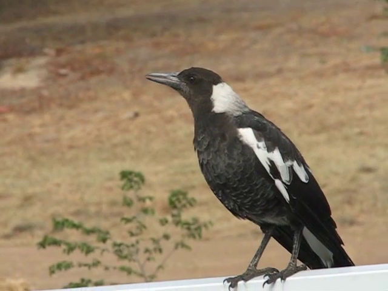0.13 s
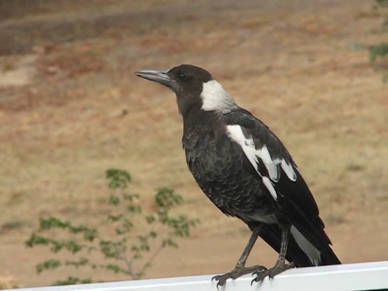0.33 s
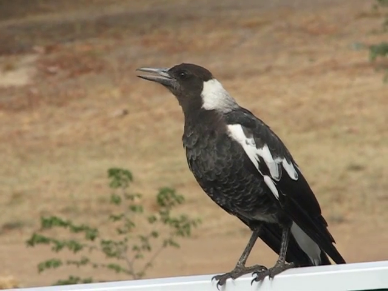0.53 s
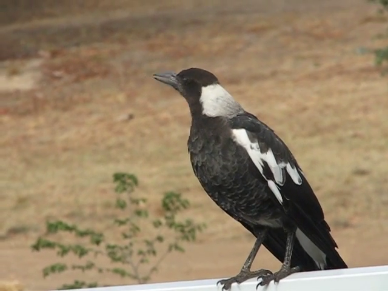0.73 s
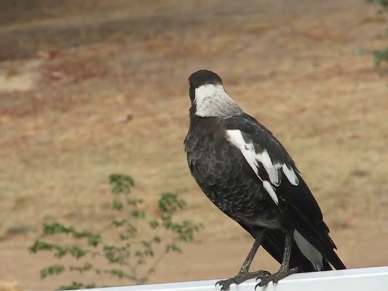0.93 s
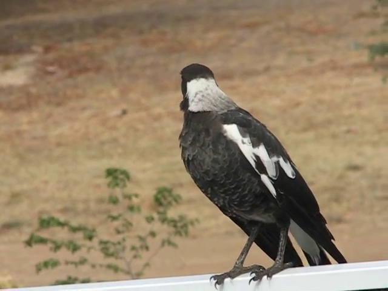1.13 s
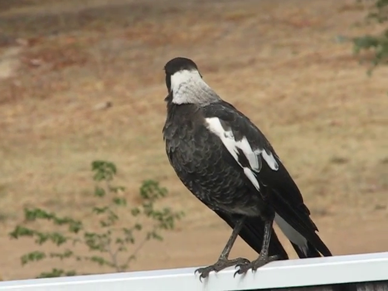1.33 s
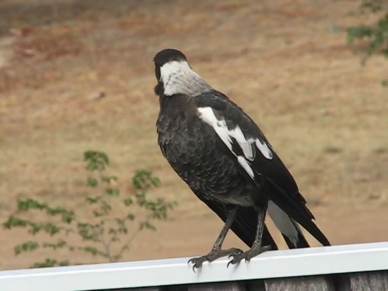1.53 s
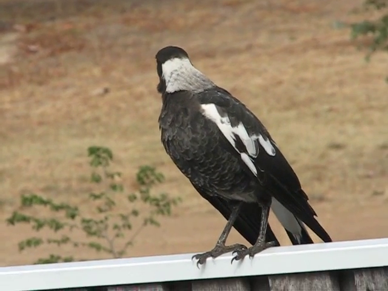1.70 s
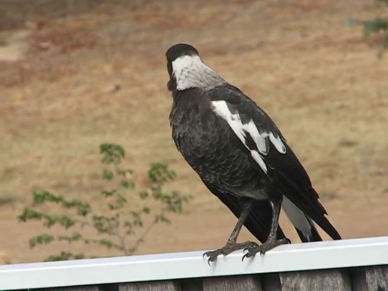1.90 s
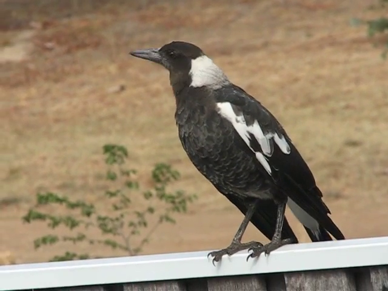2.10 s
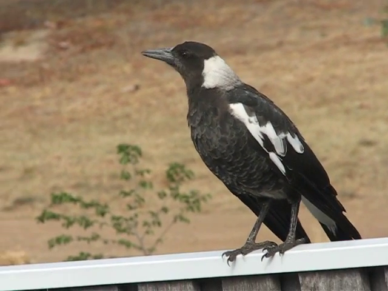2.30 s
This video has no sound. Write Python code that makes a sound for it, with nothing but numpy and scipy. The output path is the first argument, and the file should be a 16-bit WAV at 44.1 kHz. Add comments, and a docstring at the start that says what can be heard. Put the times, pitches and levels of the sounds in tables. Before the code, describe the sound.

A magpie warbles outdoors with short yard echoes. From 0.2 to 0.7 s, fluty notes slide and overlap, rising and then dropping to the loudest one near 0.6. Faint low murmurs follow around 0.9-1.2, hoarse warbles at 1.5-1.9, a clear pulsing note at 1.95-2.05, and a weak ending near 2.2. Soft hiss, throbbing hum, distant engine, and very faint high whines continue throughout.

```python
"""A magpie warbles: fluty sliding notes, some overlapping as from the two sides of its syrinx, in yard echoes.
Each note is a gliding sine with throat-coloured overtones; random wobbles make it waver and rasp.
Thin high sines add far birds and one ringing overtone of the magpie; sines make a beating hum and passing engine.
Shaped noise gives an outdoor hiss; there are also two faint buzzing whines and a squeal in steps.
"""
import sys
import numpy as np
from scipy import signal
from scipy.fft import rfft, irfft, next_fast_len
from scipy.io import wavfile
from scipy.ndimage import uniform_filter1d, map_coordinates

SR = 44100
rng = np.random.default_rng(int(sys.argv[2]) if len(sys.argv) > 2 else 0)


def to_wav(s):
    """Save 16-bit WAV."""
    ch = np.atleast_2d(s).T  # columns
    pcm = np.round(np.clip(ch, -1, 1) * 32767)  # PCM
    wavfile.write(sys.argv[1], SR, pcm.astype(np.int16))


N = 103635
T = np.arange(N) / SR  # time in seconds
TOP_HZ = 15690  # no sound is kept from here up
EDGE_S = 0.0034  # fade at each end of a short sound


def amp(db):
    """Turn decibels into a plain multiplier."""
    return 10 ** (np.asarray(db) / 20)


def unit(x):
    """Scale a signal to an average strength (rms) of 1."""
    return x / np.sqrt(np.mean(x ** 2) + 1e-20)


def along(points, hz):
    """Read (Hz, value) points at any frequency, on a log axis."""
    f, v = np.transpose(points)
    return np.interp(np.log(hz + 1), np.log(f + 1), v)


def curves(rows, t=T):
    """Join the points of each column after the time, giving one value per moment."""
    s, *cols = np.transpose(rows)
    return [np.interp(t, s, c) for c in cols]


def wobble(rate):
    """A smooth random curve through this many random points a second."""
    points = rng.standard_normal(int(N * rate / SR) + 4)
    return map_coordinates(points, [T * rate])


def tone(hz, turn=0):
    """A sine of rms 1 that follows a pitch curve; turn is its starting point in cycles."""
    cycles = np.cumsum(hz) / SR + turn
    return np.sqrt(2) * np.sin(2 * np.pi * cycles)


def filtered(x, response):
    """Multiply each frequency of x by the response at that frequency."""
    m = next_fast_len(N + SR // 2)
    gain = response(np.fft.rfftfreq(m, 1 / SR))
    return irfft(rfft(x, m) * gain, m)[..., :N]


def edges(t, start, end):
    """A soft start and stop, silent outside."""
    nearest_end = np.minimum(t - start, end - t)
    return np.sin(np.pi / 2 * np.clip(nearest_end / EDGE_S, 0, 1)) ** 2


def magpie():
    """A syrinx gives near-sine notes; the throat colours their hoarse overtones."""
    # magpie notes: (overtones/dB, roughness 0-1, [(t/s, f/Hz, level/dB)])
    notes = [ (-10, 0.012, [(.222, 902, -37.5), (.243, 1010, -25.5), (.265, 1007, -36)]),
             (-6, 0.23, [(.258, 832.6, -35.5), (.295, 677, -36.5), (.33, 774.4, -34), (.37, 636, -41.5)]),
             (-6.5, 0.0097, [(.399, 1258, -26), (.445, 1339, -24.5), (.458, 1413, -36.5),
             (.472, 1463, -21.5), (.495, 1658, -30.5)]), (6, 0.22, [(.481, 956, -32.5), (.515, 1018, -35)]),
             (-12, 0.014, [(.512, 1445, -30), (.548, 1432, -22.5), (.575, 1529, -18.5), (.6, 1555, -35.5)]),
             (-3, 0.016, [(.582, 1177, -24), (.617, 1202, -13), (.634, 1136, -23.5), (.65, 1098, -16.5),
             (.675, 1128, -20), (.725, 1093, -29.5)]), (-12, 0.18, [(1.088, 1032, -32), (1.12, 753.5, -43),
             (1.16, 862, -38), (1.2, 706, -41.5)]), (-9, 0.19, [(1.482, 1215, -37), (1.525, 1030, -31),
             (1.59, 1053, -43)]), (-3.5, 0.17, [(1.604, 1580, -37), (1.615, 1201, -28.5),
             (1.635, 1121, -28.5), (1.65, 1376, -37), (1.683, 1124, -40)]), (-17, 0.27, [(1.695, 1465, -36),
             (1.725, 1375, -28.5), (1.75, 1234, -39), (1.768, 1040, -30), (1.8, 1092, -34.5)]),
             (-8, 0.083, [(1.8, 741, -36), (1.825, 801, -32.5), (1.85, 620, -34), (1.9, 763.5, -41.5),
             (1.935, 760, -35.5)]), (5.5, 0.334, [(1.95, 1226, -55), (1.975, 1429, -28), (1.987, 1204, -34),
             (2.02, 1227, -38), (2.07, 1140, -56)]), (-3, 0.084, [(1.94, 1005, -32), (1.958, 1008, -19.5),
             (1.978, 995, -32.5), (2.0, 1000, -16.5), (2.017, 1041, -28), (2.032, 1016, -18),
             (2.062, 1055, -37.5)]), (-7.5, 0.047, [(2.196, 1003, -35), (2.203, 1024, -29.5),
             (2.25, 1150, -55)]), ]
    # brief glides of the magpie; the second row is not a note of its own but the strong
    # second overtone of the note near 1000 Hz, sliding upward:
    # (start/s, length/s, first f/Hz, last f/Hz, level in the middle/dB)
    glides = [(0, 0.056, 978, 1012, -35.5), (0.482, 0.038, 1752, 2135, -37.5),
              (0.936, 0.11, 1007, 990, -37), (0.919, 0.16, 701, 888, -37), (1.061, 0.03, 1308, 1486, -34),
              (1.213, 0.012, 1197, 1244, -38), (1.502, 0.045, 1261, 1076, -31),
              (1.567, 0.022, 1210, 1260, -29), (1.855, 0.045, 1060, 940, -33.5),
              (1.893, 0.031, 1443, 1455, -37.5), (1.908, 0.039, 1319, 1216, -31.5),
              (2.127, 0.042, 678, 790, -33)]
    # throat colour: (f/Hz, overtone level against the fundamental/dB)
    throat = [(1350, -3), (2200, -20), (3500, -30), (4500, -17), (5900, -32.5), (9000, -33), (14500, -65)]
    glide_rough, glide_bright_db = 0.36, -7  # roughness and overtone level of the brief glides
    glide_arch_db = 5  # a brief glide is this much weaker at both ends
    effort_s = 0.02  # overtones follow the level averaged over this long
    waver_depth, smear = 0.013, 0.13  # slow and fast pitch changes, scaled by roughness below

    brief_glides = []
    for start, length, first, last, db in glides:
        rows = [(start, first, db - glide_arch_db),
                (start + length / 2, (first + last) / 2, db),
                (start + length, last, db - glide_arch_db)]
        brief_glides.append((glide_bright_db, glide_rough, rows))

    song = np.zeros(N)
    waver = wobble(76)
    shimmer = wobble(331.7)  # fast enough to sound hoarse
    for bright_db, rough, rows in notes + brief_glides:
        start = max(rows[0][0] - EDGE_S, 0)
        end = rows[-1][0] + EDGE_S
        span = slice(int(start * SR), int(end * SR))
        hz, db = curves(rows, T[span])
        # each sound reads waver from its beginning
        own_waver = np.roll(waver, span.start)[span]
        hz = hz * (1 + waver_depth * (0.38 + 3 * rough) * own_waver)
        rasp_share = np.sqrt(np.abs(rough))

        overtones = 0
        for k in range(2, 15):
            # time shifts give each overtone its own level and pitch flutter
            flutter = 1 + 0.51 * np.roll(shimmer, k * SR // 20)[span]
            jitter = 1 + smear * rasp_share * np.roll(shimmer, -k * SR // 20)[span]
            level = amp(along(throat, k * hz)) * flutter * (k * hz < TOP_HZ)
            overtones = overtones + level * tone(k * hz * jitter)

        effort_db = uniform_filter1d(db, int(effort_s * SR))
        voice = amp(db) * tone(hz) + amp(effort_db + bright_db) * overtones
        # rough sounds swap some of their steady level for a random one
        rasp = np.sqrt(np.abs(1 - rough)) + rasp_share * np.roll(shimmer, span.start)[span]
        song[span] += rasp * edges(T[span], start, end) * voice
    return song


def yard(x, wet_db):
    """Echoes blur into a fading noise tail after the direct sound, different on each side."""
    # echo fade: (f/Hz, time to fall by 60 dB/s)
    fade_times = [(900, 0.33), (5000, 0.2)]
    noise = rng.standard_normal((2, SR * 3 // 4))
    hz, t, z = signal.stft(noise, SR, nperseg=256)
    fade = amp(-60 * t / along(fade_times, hz)[:, None])
    tail = signal.istft(z * fade, SR, nperseg=256)[1]
    tail = np.array([tail[0] + 0.5 * tail[1], tail[0] - 0.5 * tail[1]])
    tail *= amp(wet_db) / np.linalg.norm(tail[0])
    tail[:, 0] += 1  # the direct sound
    return signal.fftconvolve(x[None], tail, axes=1)[:, :N]


def thin_high_tones():
    """Gliding sines, blurred by random level and pitch: far birds and one magpie overtone."""
    # small far birds, but the second row is a high overtone of the magpie's low note,
    # ringing in its throat: (start/s, length/s, first f/Hz, last f/Hz, level/dB)
    high_glides = [(0.861, 0.17, 4500, 3764, -59.5), (1.82, .07, 7850, 7200, -54),
                   (1.925, 0.016, 3690, 4800, -51), (1.939, 0.035, 4870, 4800, -56),
                   (2.034, 0.073, 5850, 5270, -59)]
    tones = np.zeros(N)
    for start, length, first, last, db in high_glides:
        level = amp(db + 3.8 * wobble(90))
        glide = np.interp(T, [start, start + length], [first, last])
        tones += level * edges(T, start, start + length) * tone(glide * (1 + 0.015 * wobble(300)))
    return tones


def machine_hum():
    """A machine's speed sets its hum; a second tone just below beats with it as a throb."""
    # machine speed: (t/s, f/Hz)
    speed_points = [(0, 77.74), (2.35, 75.7)]
    # hum tones: (multiple of the speed, level/dB)
    hum_orders = [(1, -46.5)]
    # lower tone: (t/s, level/dB)
    throb_points = [(0, -63), (.6, -50), (1.3, -52), (1.9, -59)]
    throb_hz = 7.8  # gap between the two tones, so beats a second
    speed, = curves(speed_points)
    hum = sum(amp(db + wobble(6)) * tone(speed * k) for k, db in hum_orders)
    throb = amp(curves(throb_points)[0]) * tone(speed - throb_hz, 0.22)
    return hum + throb


def engine():
    """A passing engine sounds at multiples of its firing rate, wavering in level and pitch."""
    # engine passing: (t/s, firing f/Hz, level change/dB)
    passing = [(0, 36, -13.5), (1.2, 35.68, 1.5), (2.35, 35.31, -3.5)]
    # engine tones: (multiple of the firing rate, level before the change/dB)
    engine_orders = [(6, -50.5), (7, -52), (8, -52)]
    firing, pass_db = curves(passing)
    sound = np.zeros(N)
    for k, db in engine_orders:
        level = amp(db + pass_db + 3.8 * wobble(7.45))
        pitch = k * firing * (1 + 0.01216 * wobble(9.13))
        sound += level * tone(pitch, rng.random())
    return sound


def hiss():
    """Outdoor noise, near mono in the bass, slightly patchy in time and frequency."""
    # noise colour: (f/Hz, relative level per Hz/dB)
    colour = [(30, -20.5), (90, -7), (230, -5), (400, -18), (900, -15), (1500, -19), (8200, -26),
              (10000, -34.5), (15600, -40)]
    # left-right likeness: (f/Hz, 1 for the same to -1 for opposite)
    likeness = [(60, 1), (290, 0.913), (1400, 0.63), (4500, -0.27)]
    # balance: (f/Hz, left over right/dB)
    balance = [(1500, -0.5), (2400, -3.5), (6000, 0)]
    hiss_db = -43.5  # rms level over both sides

    z = signal.stft(rng.standard_normal((2, N)), nperseg=512)[2]
    field = rng.standard_normal(z.shape[1:])
    field = uniform_filter1d(field, size=6, axis=0)
    field = uniform_filter1d(field, size=14, axis=1)
    pair = signal.istft(z * amp(0.36 * unit(field)), nperseg=512)[1][:, :N]

    def colour_and_width(hz):
        # the angle splits the noise between the shared and the opposite part
        angle = np.arccos(np.clip(along(likeness, hz), -1, 1)) / 2
        return amp(along(colour, hz)) * [np.cos(angle), np.sin(angle)]

    def side_gains(hz):
        return amp(along(balance, hz) * [[0.5], [-0.5]])

    mid, side = filtered(pair, colour_and_width)
    sides = np.array([mid + side, mid - side])
    return amp(hiss_db) * unit(filtered(sides, side_gains))


def whines():
    """Steady high tones buzz because their sign flips quickly."""
    # whines: (f/Hz, level/dB, left over right/dB)
    whine_tones = [(7867, -62.5, -11), (8265, -59.5, -14.5)]
    flips_hz = 30  # sign flips a second
    flips = np.clip(8 * np.sin(np.pi * flips_hz * T), -1, 1)
    whine = np.zeros((2, N))
    for hz, db, pan in whine_tones:
        level = amp(db + 0.37 * wobble(11.34))
        whine += level * amp([[pan / 2], [-pan / 2]]) * flips * tone(np.full(N, hz))
    return whine


def squeal():
    """A gliding sine jumps in pitch twice a second; fast pitch wobble makes it fuzzy."""
    # alternating steps: (first f/Hz, f half a second on/Hz)
    squeal_steps = [(12450, 13000), (11700, 12200)]
    start_s, width_hz = 0.2, 130  # time of a jump, size of the pitch wobble
    steps = 2 * (T - start_s)
    first, last = np.transpose(squeal_steps)[:, np.floor(steps).astype(int) % 2]
    glide = first + (last - first) * np.sqrt(steps % 1)
    level = amp(-75 + 2.1 * wobble(5.2))  # dB, before the side gains
    return level * tone(glide + width_hz * wobble(200)) * amp([[2.5], [-5]])


def scene():
    """Place the song and thin tones in echoes over a background that swells at the start."""
    # pairs of gains are left and right, in dB
    song = yard(magpie(), -6) * amp([[-4.4], [-3.8]])
    high_tones = yard(thin_high_tones(), -3) * amp([[1.2], [-2.5]])
    swell_db, swell_s = -5.5, 0.51  # background level at the start, time to reach 0 dB
    swell = amp(swell_db * np.clip(1 - T / swell_s, 0, 1))
    background = machine_hum() + engine() + hiss() + whines() + squeal()
    return song + high_tones + swell * background


def record(dry):
    """Cut away everything from the top frequency up."""
    return filtered(dry, lambda hz: hz < TOP_HZ)


dry = scene()
out = record(dry)
to_wav(out)
```